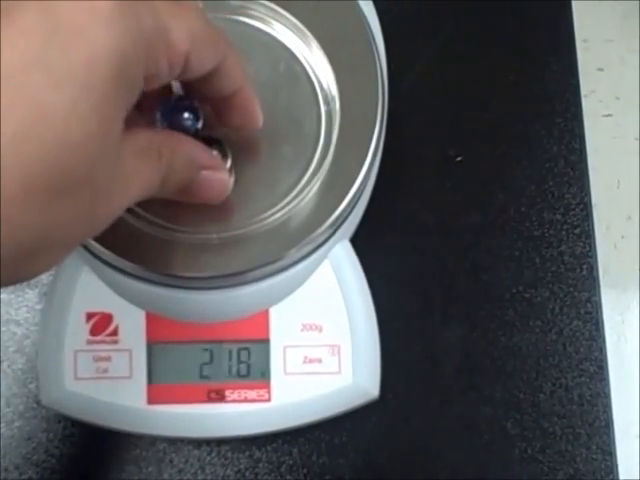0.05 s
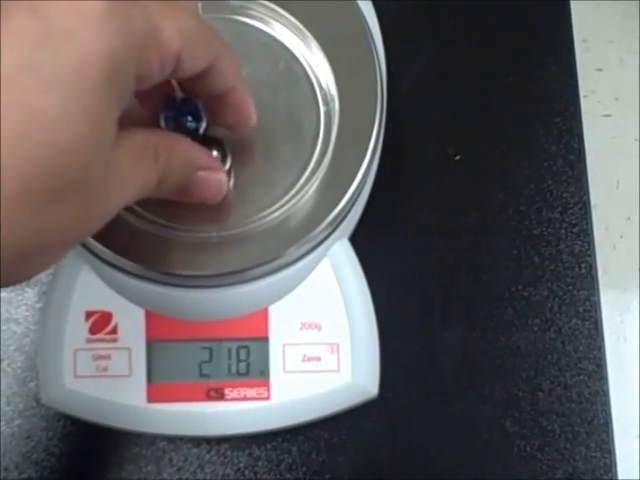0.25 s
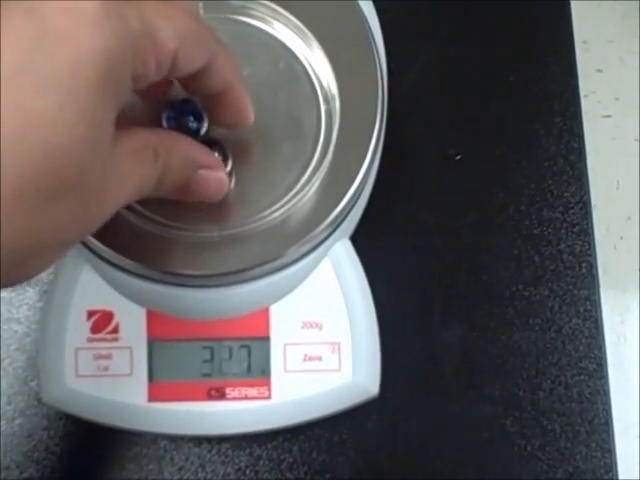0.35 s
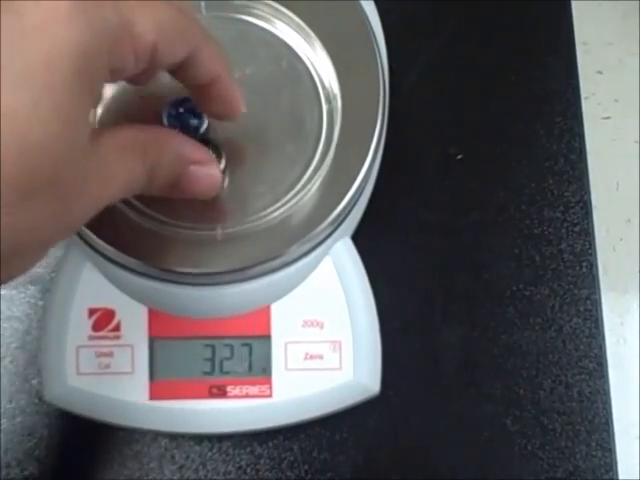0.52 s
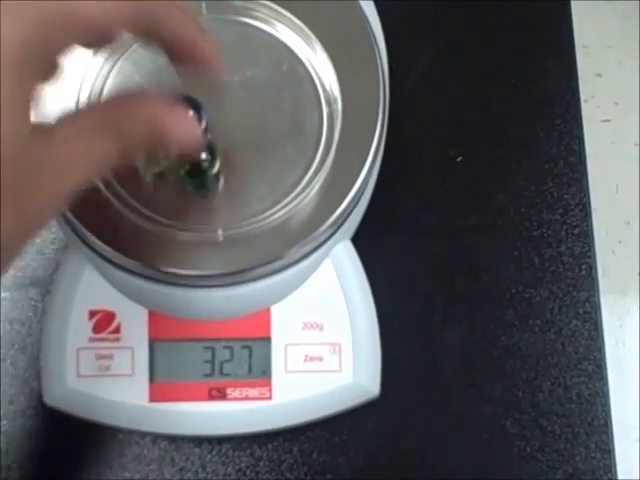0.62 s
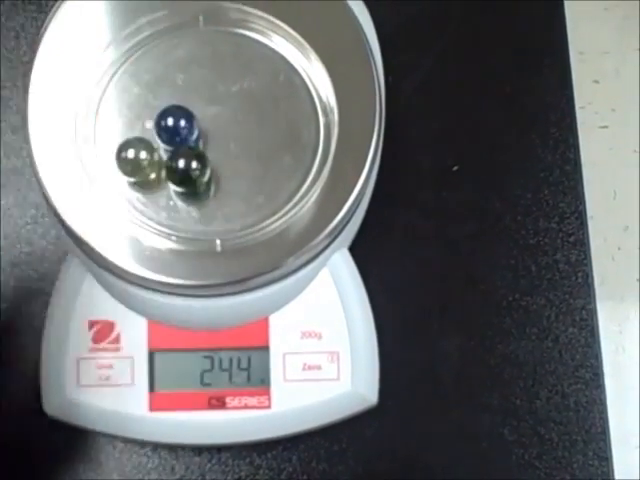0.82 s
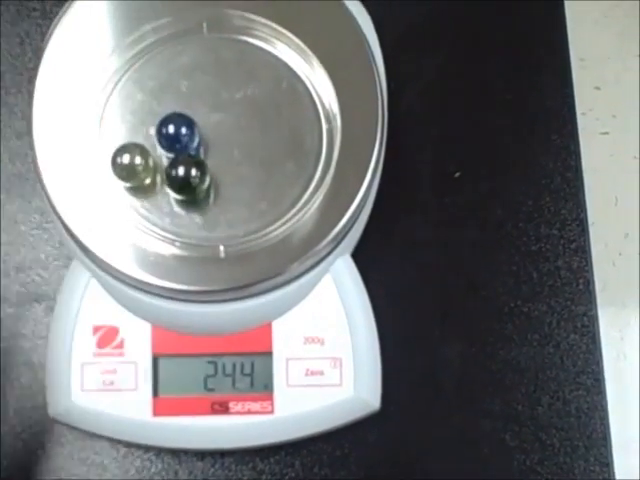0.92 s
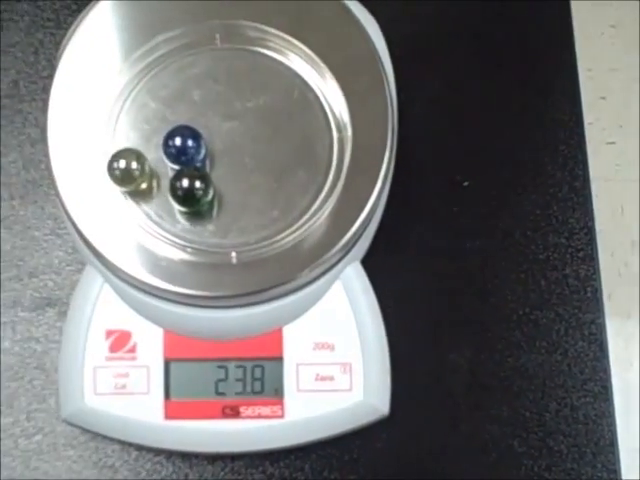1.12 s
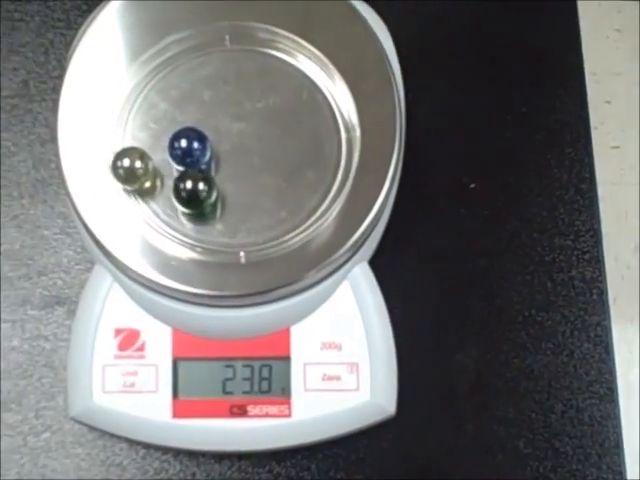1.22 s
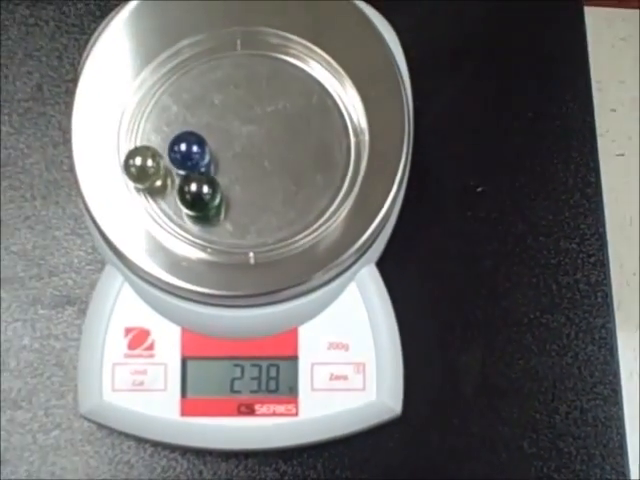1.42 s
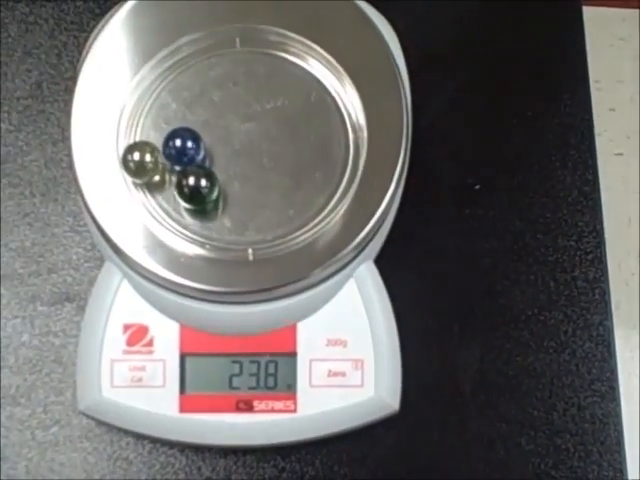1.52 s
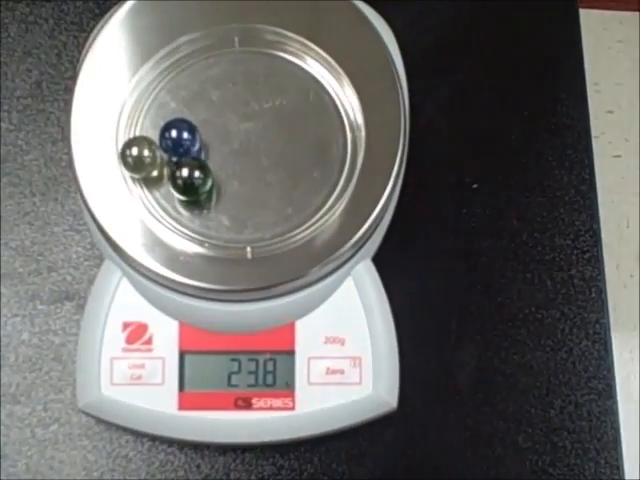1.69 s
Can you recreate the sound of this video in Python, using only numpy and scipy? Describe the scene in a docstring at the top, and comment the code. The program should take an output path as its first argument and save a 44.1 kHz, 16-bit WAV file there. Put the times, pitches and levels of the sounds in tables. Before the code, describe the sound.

Sharp clink of a marble landing on a metal scale pan, then faint settling ticks.

```python
"""Indoors, in a quiet room, one microphone close to the steel pan of a small scale.
A glass marble, let go just above it, nicks the marbles already there, then lands and bounces in
quick hops, each a hard crack that sets the pan ringing. It rolls faintly across the steel and
ticks against its neighbours. Behind it lie a short room tail, a low rumble and mains hum."""
import sys
import numpy as np
from scipy import signal
from scipy.fft import rfft, irfft
from scipy.io import wavfile
from scipy.ndimage import uniform_filter1d

SR = 44100
rng = np.random.default_rng(int(sys.argv[2]) if len(sys.argv) > 2 else 0)


def transcribe(u):
    """Save the signal u as a 16-bit wav file named by the first command-line argument.

    u: samples, shape (n,) or (channels, n), limited to [-1, 1]; the rate is SR.
    q: integer samples, one column per channel.
    """
    v = np.clip(np.atleast_2d(u).T, -1, 1)
    q = np.round(v * 32767).astype(np.int16)
    wavfile.write(sys.argv[1], SR, q)


N = 77175
T = np.arange(N) / SR

# the marble lands on the pan: (time [s], ring level [dB], crack level [dB])
LANDINGS = [(0.2129, 0, -1), (0.2246, -23.5, -13), (0.2297, -32, -29), (0.2367, -28.5, -36)]
# the steel pan on its plastic base: (frequency [Hz], level [dB], t60 [s])
STEEL_MODES = [(384.4, -38, .16), (461.4, -40, .08), (499, -47.5, 0.16), (662, -46.5, 0.18),
               (784, -52, 0.16), (1044, -49, 0.017), (1216, -48, 0.04), (1360, -35.5, 0.051),
               (1420, -32, 0.056), (1485, -30.5, 0.039), (1613, -38.5, 0.076), (1722, -57, 0.12),
               (1963, -42.5, 0.069), (2255, -29.5, 0.048), (2365, -31, 0.055), (2557, -39.5, 0.046),
               (3010, -37, 0.026), (3243, -35.5, 0.056), (4100, -47.5, 0.06), (4925, -42.5, 0.018),
               (5360, -44, 0.033), (6236, -37, 0.037), (6630, -40.5, .035), (7250, -38, 0.019)]
# the pan's crowd of fine overtones: (frequency [Hz], relative density [dB])
SHIMMER_SPECTRUM = [(300, -18.5), (600, -12), (1000, -7.5), (1500, -4.5), (2400, -2), (3600, -5.5),
                    (5000, -5), (7000, -6.5), (8000, -5), (10500, -11.5), (12000, -12.5), (15500, -7)]
# glass hitting steel, with the thud of the base: (frequency [Hz], level [dB], t60 [s])
CONTACT_MODES = [(437, -32.5, 0.027), (1490, -26, 0.0042), (4340, -24.5, 0.0042), (4970, -15, 0.0031),
                 (6740, -18, 0.0037), (10030, -21.5, 0.0034), (13400, -22, 0.0035)]
# glass touches glass: (time [s], level [dB], pitch [ratio], treble cutoff [Hz], level into pan [dB])
TOUCHES = [(0.0258, -41.5, 0.91, 8700, -32.5), (0.1968, -45, 1.1, 12000, -38),
           (0.2003, -36.5, 0.99, 14100, -43), (0.6516, -50.5, 0.84, 13000, -45.5),
           (0.7382, -59.5, 0.77, 9000, -54), (1.2067, -56.5, 0.72, 10900, -61),
           (1.3406, -62, 0.82, 9000, -52), (1.5443, -44.5, 1.01, 13900, -45.5),
           (1.5616, -49, 1.14, 8500, -44), (1.6075, -53.5, 1.06, 7000, -58)]
# the clack of two marbles: (frequency [Hz], level [dB], t60 [s])
GLASS_MODES = [(4120, -9.5, 0.0042), (5580, -1.5, 0.0036), (7700, -7.5, 0.0044), (9930, -3.5, 0.0032),
               (12000, -7, 0.005), (14500, -3, .002)]
# the course of the roll: (time [s], level [dB])
ROLL_LEVELS = [(0, -72), (.6, -91), (.85, -79.5), (1.12, -72.5), (1.3, -71.5), (1.5, -75), (1.62, -78),
               (1.75, -79)]
# glass grinding on steel: (frequency [Hz], relative density [dB])
GRIND_SPECTRUM = [(300, 0), (650, 5.5), (1400, -2), (2300, -1.5), (4500, -6.5), (7000, -12.5), (11000, -14),
                  (16000, -15)]
# the room's reflections: (frequency [Hz], relative density [dB])
ROOM_SPECTRUM = [(150, 8.5), (400, 3), (1500, -3), (2400, -7.5), (3800, -2), (6000, -7.5), (8500, 3.5),
                 (16000, -8)]
# each crack's diffuse spread through the room: (frequency [Hz], relative density [dB])
WASH_SPECTRUM = [(400, -4), (1400, 0), (2500, -3), (4000, -0.5), (6000, 2), (8500, -5), (12000, -5),
                 (16000, -6)]
# room rumble and hiss: (frequency [Hz], relative density [dB])
RUMBLE_SPECTRUM = [(10, 5.5), (30, 0.5), (45, -3), (65, -1), (95, -11), (130, -8), (190, -9.5), (280, -13),
                   (400, -18.5), (750, -19), (1200, -27.5), (2200, -35.5), (5000, -39.5), (15500, -43)]
# mains hum: (frequency [Hz], rms level [dB])
HUM_TONES = [(59.5, -71.5), (120, -70.5)]


def bounces(pan):
    """Close to the microphone, each landing cracks and sets the pan ringing."""
    times, ring_db, crack_db = np.transpose(LANDINGS)
    return drive(clicks(times, ring_db), pan) + drive(clicks(times, crack_db), ring(CONTACT_MODES))


def steel_pan():
    """The pan's answer to one blow: its main modes and a fine metallic shimmer."""
    return ring(STEEL_MODES) + from_db(-29) * dying_noise(SHIMMER_SPECTRUM, t60=0.06, slope=0.44)


def ticks(pan):
    """Marbles touch with a tiny clack, a little of which reaches the pan."""
    glass = sum(drive(clicks([at], [db]), soften(ring(GLASS_MODES, pitch), cutoff_hz))
                for at, db, pitch, cutoff_hz, _ in TOUCHES)
    times, _, _, _, pan_db = np.transpose(TOUCHES)
    return glass + drive(clicks(times, pan_db), pan)


def rolling(pan):
    """Rough glass grinds over the steel and stirs its modes; at the rim it swells and sings briefly."""
    rim_s, rim_width_s, note_hz = 1.297, 0.0052, 2235
    level = from_db(np.interp(T, *np.transpose(ROLL_LEVELS)))
    grain = from_db(rms_one(uniform_filter1d(rng.standard_normal(N), size=130)))  # 1 dB rms flutter
    grind = rms_one(noise(GRIND_SPECTRUM) * grain)
    singing = rms_one(drive(rng.standard_normal(N) * grain, pan))
    at_rim = np.exp(-.5 * ((T - rim_s) / rim_width_s) ** 2)
    rim_rub = from_db(-67) * soften(grind, cutoff_hz=2200)
    rim_note = from_db(-66) * np.sin(2 * np.pi * note_hz * T)
    return level * (grind + from_db(-13) * singing) + at_rim * (rim_rub + rim_note)


def room(near):
    """The walls return a short diffuse tail that builds over the first reflections."""
    build_s = 0.0083
    onset = 1 - np.exp(-(T / build_s) ** 2)
    tail = dying_noise(ROOM_SPECTRUM, t60=0.31, slope=0.24) * onset
    return from_db(-23) * drive(near, tail / np.sqrt(np.sum(tail ** 2)))


def wash():
    """Farther out, each landing's crack spreads through the room as an even, longer decay."""
    times, _, crack_db = np.transpose(LANDINGS)
    tail = dying_noise(WASH_SPECTRUM, t60=0.47, slope=0.17)
    return from_db(-57.5) * drive(clicks(times, crack_db), tail)


def room_tone():
    """Behind everything, steady rumble and hiss with a faint mains hum."""
    hum = sum(from_db(db) * np.sqrt(2) * np.sin(2 * np.pi * (hz * T + rng.random()))
              for hz, db in HUM_TONES)
    return from_db(-56.5) * noise(RUMBLE_SPECTRUM) + hum


def ring(modes, pitch=1):
    """A struck body: decaying sines of alternating sign."""
    return sum((-1) ** k * from_db(db) * np.sin(2 * np.pi * hz * pitch * T) * decay(t60)
               for k, (hz, db, t60) in enumerate(modes))


def clicks(times, db):
    """One impulse for each contact."""
    force = np.zeros(N)
    samples = np.round(np.asarray(times) * SR).astype(int)
    np.add.at(force, samples, from_db(db))
    return force


def drive(force, response):
    """Play a force through a response."""
    return signal.fftconvolve(force, response)[:N]


def soften(x, cutoff_hz):
    """A softer contact loses its treble."""
    return signal.sosfilt(signal.butter(2, cutoff_hz, fs=SR, output="sos"), x + 1e-18)


def noise(colour):
    """Noise with the given spectrum, falling away below its first point; rms 1."""
    hz, db = np.transpose(colour)
    f = np.maximum(np.arange(N // 2 + 1) * SR / N, 1)
    gain = from_db(np.interp(np.log(f), np.log(hz), db)) * np.minimum(f / hz[0], 1) ** 2
    return rms_one(irfft(gain * np.exp(2j * np.pi * rng.random(len(f))), N))


def dying_noise(colour, t60, slope):
    """A burst of noise whose higher bands die sooner; t60 is in seconds at 2 kHz."""
    spectrum, f = rfft(noise(colour)), np.arange(N // 2 + 1) * SR / N
    edges_hz = np.geomspace(125, 20000, 12)
    burst = np.zeros(N)
    for low, high in zip(edges_hz, edges_hz[1:]):
        band = irfft(spectrum * ((f >= low) & (f < high)), N)
        burst += band * decay(t60 * (np.sqrt(low * high) / 2000) ** -slope)
    return burst


def decay(t60):
    """An envelope that falls 60 dB in t60 seconds."""
    return np.exp(-np.log(1000) * T / t60)


def from_db(db):
    """Decibels to gain."""
    return 10 ** (np.asarray(db) / 20)


def rms_one(x):
    """Scale to rms 1."""
    return x / np.sqrt(np.mean(x ** 2) + 1e-20)


def scene():
    """Marbles and pan up close, the room behind them, in mono."""
    pan = steel_pan()
    near = bounces(pan) + ticks(pan) + rolling(pan)
    return (near + room(near) + room_tone() + wash())[None]


def record(dry):
    """The microphone's signal is cut steeply above 15.9 kHz."""
    return signal.sosfilt(signal.ellip(10, .1, 80, 15900, fs=SR, output="sos"), dry)


dry = scene()
out = record(dry)
transcribe(out)
```